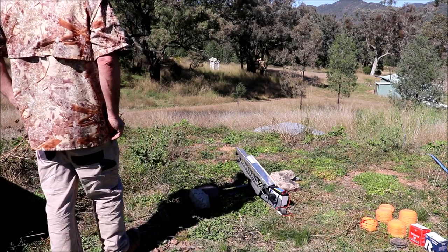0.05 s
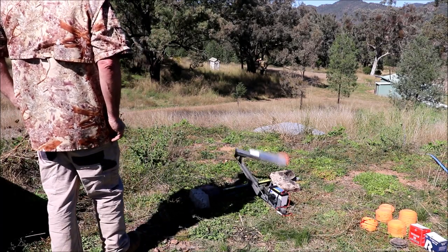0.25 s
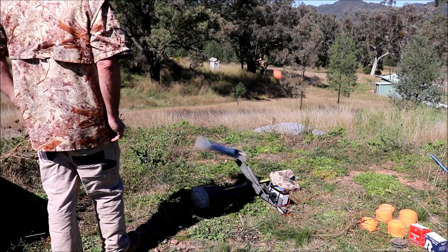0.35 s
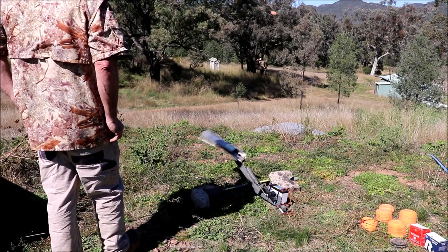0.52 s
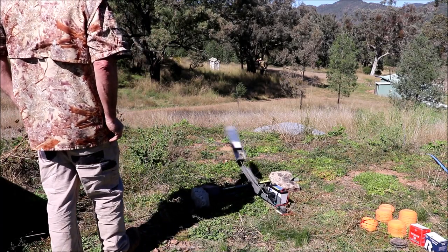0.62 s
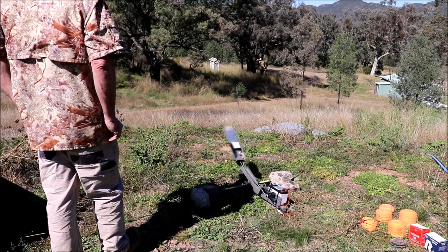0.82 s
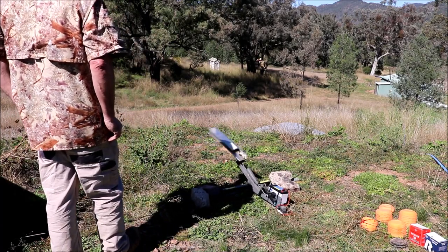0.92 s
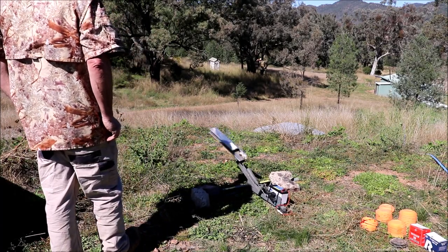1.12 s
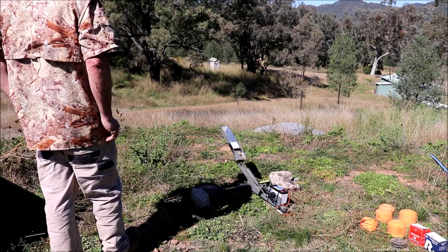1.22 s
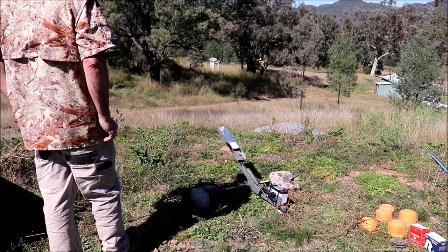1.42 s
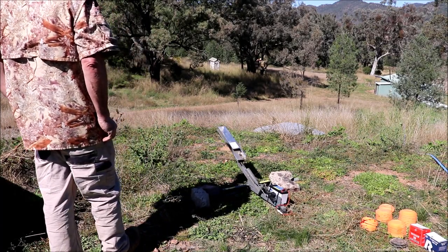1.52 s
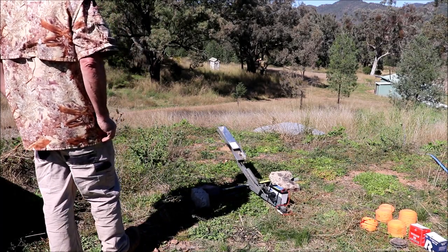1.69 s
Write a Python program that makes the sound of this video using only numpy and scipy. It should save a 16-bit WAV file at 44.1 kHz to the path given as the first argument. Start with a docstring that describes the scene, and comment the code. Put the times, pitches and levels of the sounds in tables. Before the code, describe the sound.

A clay target thrower lets go with a faint tick and hollow double knock, a brief swish and loud steel slam, then rattling knocks and spring ringing that thin out, heard fairly close in quiet open air.

```python
"""Over quiet open air comes a faint tick, then the hollow double knock of a clay target thrower's latch letting go.
The steel arm swishes round and slams past its stop, then swings to and fro, knocking and rattling.
Frame and spring ring on, a loose part clinks, the pivot groans, and a last soft knock brings the arm to rest.
Shaped noise makes the crashes, rattle, swish and air; decaying tones make the ringing metal;
an uneven, slipping tone makes the groan."""
import sys
import numpy as np
from scipy import signal
from scipy.io import wavfile
from scipy.ndimage import uniform_filter1d

SR = 44100
rng = np.random.default_rng(int(sys.argv[2]) if len(sys.argv) > 2 else 0)


def wrap_up_sound(samples):
    """Save the sound to the file named by the first command line argument, as 16-bit audio."""
    columns = np.atleast_2d(samples).T
    # keep every value between -1 and 1, then stretch to whole-number steps
    tamed = np.clip(columns, -1, 1)
    steps = np.round(tamed * 32767).astype(np.int16)
    wavfile.write(sys.argv[1], SR, steps)


N = 77175
T = np.arange(N) / SR  # time of every sample [s]
BAND_HZ = 25 * 2 ** (np.arange(29) / 3)  # centres of the third-octave bands
# In every table, t60 is the time a ring takes to fade by 60 dB.

# Steel hitting steel; bass and middle add to the contact colour: (time [s], contact length [s],
# bass [dB], middle [dB], treble slope [dB per octave, first octave], ring of the frame [dB])
KNOCKS = [(0.082, 0.0031, -37.5, -44, -1.5, -79), (0.2299, 0.0067, -29.5, -21.5, -8.5, -43),
          (0.2467, 0.0029, -22, -20.5, -1, -41), (0.3346, 0.0058, -59, -12.5, -4.5, -27.5),
          (0.347, 0.0054, -48, -8, -12, -68), (0.3499, 0.0085, -51, -24.5, 1.5, -38),
          (0.379, 0.012, -72, -22.5, -3.5, -39.5), (0.3981, 0.0032, -54, -27, -1, -31.5),
          (0.466, 0.004, -47, -22.5, 0, -31), (0.4813, 0.0059, -20, -9.5, -8, -67),
          (0.521, 0.02, -36, -41.5, 1.5, -42), (0.547, 0.011, -38, -36, 0.5, -32),
          (0.5542, 0.0043, -19, -22, 0, -33.5), (0.594, 0.042, -34, -19, -24, -34),
          (0.6346, 0.01, -48, -27, -4, -43), (0.6738, 0.008, -31, -15, -9, -44),
          (0.725, 0.0073, -69, -24.5, 0, -70), (0.7387, 0.0036, -30, -17, -0.25, -29),
          (0.845, 0.012, -45, -31.5, -8.5, -55), (0.9223, 0.012, -66, -31, -3, -50),
          (0.943, 0.004, -33.5, -14, -2.5, -32), (1.0684, 0.0081, -37.5, -39.5, 1, -52.5),
          (1.118, 0.084, -46, -38, -17, -55.5), (1.178, 0.014, -37.5, -38, -13.5, -52.5),
          (1.372, 0.032, -46, -38.5, -15.5, -47)]
BASS_HZ, MIDDLE_HZ, TREBLE_FROM_HZ = 372, 1140, 1087
TREBLE_CURVE = 1.51  # the slope grows ever steeper after the first octave
ATTACK_S, CONTACT_SHAPE = 0.00062, 0.95  # time constant of the rise; exponent of the fall
# Shared tone colour of the contacts: (frequency [Hz], relative level [dB per third octave])
CONTACT_COLOUR = [(110, -46), (310, -8.5), (600, -10.5), (900, -9.5), (3600, 1.5), (6300, -6), (8200, -4),
                  (10000, -14.5), (15000, -22.5)]
# Colour of the dense ring after a contact: (frequency [Hz], relative level [dB per third octave])
SHIMMER_COLOUR = [(60, -34), (550, -14), (1000, -4), (2400, -11), (3200, -6.5), (8000, -29), (13000, -36)]
# How long that ring lasts: (frequency [Hz], t60 [s])
SHIMMER_T60 = [(150, 0.35), (1000, 0.3), (12000, 0.19)]
WASH_DB, PARTIALS_DB = -4, -7  # shares of the shimmer made from noise and from single tones
PARTIAL_HZ = np.geomspace(750, 11000, 110)  # even spacing, before the random shifts

# Ringing tones of arm and frame: (frequency [Hz], relative level [dB], t60 [s])
FRAME_MODES = [(440.5, -8.5, 0.12), (698, -13.5, 0.88), (895, -2, 0.2), (1044, 0, 0.35), (1233, -1, 0.33),
               (1397, -7, 0.53), (1585, -16, 0.43)]
# The latch's hollow double knock: (time [s], level [dB])
LATCH_BLOWS = [(.2325, -27), (.248, -21.5)]
# Ringing tones of the latch: (frequency [Hz], relative level [dB])
LATCH_MODES = [(270, -8.5), (380, -2), (694, 2)]
# The main blow on the stop: (time [s], level [dB])
STOP_BLOWS = [(.35, -9.5)]
# Ringing tones of the stop: (frequency [Hz], relative level [dB])
STOP_MODES = [(885, -1), (965, -5), (1165, -5)]
# A bolted joint snaps across its play: (time [s], level [dB])
JOINT_BLOWS = [(.482, -28.5), (.556, -25.5), (.9265, -29)]
# Ringing tones of the joint: (frequency [Hz], relative level [dB])
JOINT_MODES = [(2950, -8), (3180, 0.5), (7009, -6.5)]
# Clinks of a loose part: (time [s], level [dB])
CLINKS = [(1.0705, -40)]
# Ringing tones of the loose part: (frequency [Hz], relative level [dB])
LOOSE_MODES = [(2433, -3), (2799, -1.5), (4479, 0), (6363, -10)]
# The arm settles on its rest: (time [s], level [dB])
REST_BLOWS = [(1.373, -44)]
# Ringing tones of the rest: (frequency [Hz], relative level [dB])
REST_MODES = [(1050, 6.5), (1997, 1.5), (3467, -4), (3693, -10)]
LATCH_T60_S, STOP_T60_S, JOINT_T60_S, LOOSE_T60_S, REST_T60_S = 0.014, 0.068, 0.083, 0.13, 0.13
BODY_T60_S, BODY_DB = 0.031, -4  # ring of the steel channel, against the direct sound
FRAME_EDGE_HZ, PARTS_EDGE_HZ = 200, 700  # little bass gets out below these

# The spring: (resting pitch [Hz], level from the jolt [dB],
# level against each knock's frame ring [dB], t60 after a knock [s])
SPRING_MODES = [(1763, -33, -14.5, 1.5), (2142, -25, -11.5, 0.7)]
JOLT_S, JOLT_T60_S, SPRING_FLUTTER_DB = 0.364, 0.43, 3
SPRING_SWAY, SWINGS_PER_S, SWAY_T60_S = 0.02, 5.3, 1.9  # sway as a share of the pitch

# The arm sweeping round: (frequency [Hz], level [dB per third octave])
SWISH_COLOUR = [(200, -64.5), (950, -44.5), (4800, -45), (8000, -56.5)]
SWISH_S, SWISH_WIDTH_S = 0.2975, 0.022
# Loose joints chattering: (frequency [Hz], level [dB per third octave])
RATTLE_COLOUR = [(50, -81.5), (380, -45), (3200, -54.5), (11000, -65)]
RATTLE_S, RATTLE_WIDTH_S, RATTLE_T60_S = 0.62, 0.19, 0.03
RATTLE_PER_S, RATTLE_SPREAD_DB = 160, 4  # average touches per second; how their strength varies
GRIT_DB, GRIT_FROM_HZ = 4, 2200

# Quick slips of the pivot, before jitter: (time [s], rate [slips per s])
GROAN_RATE = [(1.245, 402), (1.28, 445), (1.32, 415)]
# Tones at 1, 2, 3... times the slip rate: (level [dB])
GROAN_OVERTONES_DB = [-45.5, -44.5, -47.5, -57]
GROAN_S, GROAN_WIDTH_S, GROAN_JITTER = 1.2785, 0.033, 0.0177  # jitter as a share of the rate
GROAN_RASP_DB = -21  # against the sweep of the arm
# Single tones as the frame rocks and settles: (time [s], width [s], frequency [Hz], level [dB])
SINGING = [(.595, 0.024, 152.1, -43.5), (0.683, .017, 707, -29.5), (0.878, 0.026, 688, -43),
           (0.986, 0.031, 144.2, -48.5), (1.6, 0.24, 353.7, -63.5)]

# Outdoor background: (frequency [Hz], level [dB per third octave])
AIR_COLOUR = [(25, -83), (400, -73.5), (5000, -71), (10000, -76.5)]
# Stereo width of all noise: (frequency [Hz], side against mid level [dB])
STEREO_WIDTH = [(30, -8.5), (2000, -102), (13000, -2.5)]
CUTOFF_HZ = 16000


def from_db(db):
    """Turn decibels into gain."""
    return 10 ** (np.asarray(db) / 20)


def fade(age, t60):
    """Gain of a ring after some time."""
    return from_db(-60 * age / t60)


def onset(age):
    """The quick rise of a contact."""
    return 1 - np.exp(-age / ATTACK_S)


def swell(s, width):
    """A smooth rise and fall around one moment."""
    return np.exp(-((T - s) / width) ** 2 / 2)


def wander(size):
    """Smooth random drift of spread 1, averaged over that many samples."""
    drift = uniform_filter1d(rng.standard_normal(N), size=size)
    return drift / drift.std()


def at_bands(points):
    """Read a table of (frequency, value) at every band centre, as a column."""
    hz, value = np.transpose(points)
    return np.interp(np.log(BAND_HZ), np.log(hz), value)[:, None]


def noise_bands():
    """Third-octave noise in stereo: channels x bands x samples, each mid band at rms 1."""
    # the extra tenth of a second lets the filters settle
    white = rng.standard_normal((2, 2, N + SR // 10))
    edge = 2 ** (1 / 6)
    bands = []
    for k, hz in enumerate(BAND_HZ):
        sos = signal.butter(2, [hz / edge, hz * edge], "band", fs=SR, output="sos")
        band = signal.sosfilt(sos, white[k % 2])[:, -N:]
        bands.append(band / band.std(axis=1, keepdims=True))
    mid, side = np.swapaxes(bands, 0, 1)
    side = side * from_db(at_bands(STEREO_WIDTH))
    return np.array([mid + side, mid - side])


def ring_power(kicks, t60):
    """Let the power of each kick die away."""
    return signal.lfilter([1], [1, -fade(1 / SR, t60) ** 2], kicks)


def knocks():
    """Power per band of the knocks: a short crash of contact, then the steel's dense ring dying away."""
    power, kicks = np.zeros((len(BAND_HZ), N)), np.zeros(N)
    octaves_up = np.maximum(np.log2(BAND_HZ / TREBLE_FROM_HZ), 0)[:, None]
    age = T[:SR // 10]
    for s, length, bass_db, middle_db, slope, ring_db in KNOCKS:
        start = int(s * SR)
        shape = onset(age) * np.exp(-(age / length) ** CONTACT_SHAPE)
        balance = at_bands([(BASS_HZ, bass_db), (MIDDLE_HZ, middle_db)])
        treble = slope * octaves_up ** TREBLE_CURVE
        colour = at_bands(CONTACT_COLOUR) + balance + treble
        power[:, start:start + len(age)] += (from_db(colour) * shape) ** 2
        kicks[start] += from_db(ring_db) ** 2
    tails = np.array([ring_power(kicks, t60) for t60 in at_bands(SHIMMER_T60).ravel()])
    return power + from_db(at_bands(SHIMMER_COLOUR) + WASH_DB) ** 2 * tails


def strike(blows, modes):
    """Each blow sets every tone ringing from zero, pushed in a random direction, and it dies away."""
    s, db = np.transpose(blows)
    out = np.zeros(N)
    signs = rng.choice([-1, 1], (len(s), len(modes)))
    for (hz, mode_db, t60), sign in zip(modes, signs.T):
        kicks = np.full(N, 1e-18, complex)  # not quite zero, to keep the filter fast
        kicks[(s * SR).astype(int)] = from_db(db + mode_db) * sign
        # a spinning complex number that shrinks: its imaginary part is a fading sine
        turn = fade(1 / SR, t60) * np.exp(2j * np.pi * hz / SR)
        out += signal.lfilter([1], [1, -turn], kicks).imag
    return out


def partials():
    """The steel's many weak overtones, unevenly spaced: (frequency [Hz], relative level [dB], t60 [s])."""
    hz = PARTIAL_HZ + np.gradient(PARTIAL_HZ) * (rng.random(len(PARTIAL_HZ)) - .5)
    db = np.interp(hz, BAND_HZ, at_bands(SHIMMER_COLOUR).ravel())
    t60 = np.interp(hz, BAND_HZ, at_bands(SHIMMER_T60).ravel())
    return list(zip(hz, db + PARTIALS_DB, t60))


def frame():
    """Every knock sets the tones and overtones of arm and frame ringing."""
    blows = [(row[0], row[-1]) for row in KNOCKS]
    return strike(blows, FRAME_MODES + partials())


def part(blows, modes, t60):
    """A small part whose tones all die away alike."""
    return strike(blows, [(hz, db, t60) for hz, db in modes])


def latch():
    """The latch lets go: low, very short tones give a hollow double knock."""
    return part(LATCH_BLOWS, LATCH_MODES, LATCH_T60_S)


def small_parts():
    """Stop, bolted joint, loose part and rest each ring at their own tones when hit."""
    stop = part(STOP_BLOWS, STOP_MODES, STOP_T60_S)
    joint = part(JOINT_BLOWS, JOINT_MODES, JOINT_T60_S)
    loose = part(CLINKS, LOOSE_MODES, LOOSE_T60_S)
    rest = part(REST_BLOWS, REST_MODES, REST_T60_S)
    return stop + joint + loose + rest


def through_body(x):
    """Contacts reach the air partly through the steel channel's short, uneven ring; power is kept."""
    age = T[:SR // 20]
    ring = rng.standard_normal(len(age)) * fade(age, BODY_T60_S)
    response = from_db(BODY_DB) * ring / np.linalg.norm(ring)
    response[0] += 1  # the direct sound
    response = response / np.linalg.norm(response)
    return signal.fftconvolve(x, response[None], axes=1)[:, :N]


def radiate(x, edge_hz):
    """Narrow steel parts radiate almost no bass."""
    return signal.sosfilt(signal.butter(3, edge_hz, "high", fs=SR, output="sos"), x)


def spring():
    """Jolted once and topped up by knocks; its pitch sways as the swinging arm stretches it."""
    age = np.maximum(T - JOLT_S, 0)
    swing = np.cos(2 * np.pi * SWINGS_PER_S * age) * fade(age, SWAY_T60_S)
    stretch = 1 + SPRING_SWAY * swing
    turns = 2 * np.pi * np.cumsum(stretch) / SR
    out = 0
    for hz, jolt_db, knock_db, t60 in SPRING_MODES:
        energy = 0
        for s, *_, ring_db in KNOCKS:
            ring = from_db(ring_db + knock_db) * fade(np.abs(T - s), t60)
            energy = energy + (T > s) * ring ** 2
        level = from_db(jolt_db) * fade(age, JOLT_T60_S) + np.sqrt(energy)
        flutter = from_db(SPRING_FLUTTER_DB * np.clip(wander(size=900), -2, 2))
        out = out + level * flutter * np.sin(hz * turns)
    return onset(age) * out  # silent until the jolt


def rattle():
    """Power per band of many small random contacts in the joints, once the arm has hit the stop."""
    strength = from_db(RATTLE_SPREAD_DB * np.clip(rng.standard_normal(N), -2, 2))
    touches = (rng.random(N) < RATTLE_PER_S / SR) * strength ** 2
    power = ring_power(touches, RATTLE_T60_S)
    moving = swell(RATTLE_S, RATTLE_WIDTH_S) * (T > STOP_BLOWS[0][0])
    return (from_db(at_bands(RATTLE_COLOUR)) * moving) ** 2 * power / power.mean()


def friction():
    """Power per band of steel rubbing on steel: the sweeping arm, and faintly the groaning pivot."""
    sweep = swell(SWISH_S, SWISH_WIDTH_S)
    rasp = from_db(GROAN_RASP_DB) * swell(GROAN_S, GROAN_WIDTH_S)
    return (from_db(at_bands(SWISH_COLOUR)) * (sweep + rasp)) ** 2


def grit():
    """Rough steel touches in tiny uneven catches: a treble gain that keeps the mean power."""
    gain = from_db(GRIT_DB * np.clip(wander(size=30), -2, 2))
    return np.where(BAND_HZ[:, None] > GRIT_FROM_HZ, gain / np.sqrt(np.mean(gain ** 2)), 1)


def clatter():
    """Knocks, rattle and friction add their power and shape one noise, made gritty in the treble."""
    power = knocks() + rattle() + friction()
    return (noise_bands() * np.sqrt(power) * grit()).sum(axis=1)


def groan():
    """The pivot sticks and slips unevenly, at a rate that rises and sags as the arm slows."""
    rate = np.interp(T, *np.transpose(GROAN_RATE)) * (1 + GROAN_JITTER * wander(size=200))
    phase = 2 * np.pi * np.cumsum(rate) / SR
    voice = 0
    for number, db in enumerate(GROAN_OVERTONES_DB, start=1):
        unevenness = 1 + .5 * wander(size=100)
        voice = voice + from_db(db) * unevenness * np.sin(number * phase)
    return swell(GROAN_S, GROAN_WIDTH_S) * voice


def singing():
    """Single resonances of the steel that swell and fade as the frame rocks and settles."""
    return sum(from_db(db) * swell(s, width) * np.sin(2 * np.pi * hz * T) for s, width, hz, db in SINGING)


def open_air():
    """A quiet, steady outdoor background of shaped noise."""
    return (noise_bands() * from_db(at_bands(AIR_COLOUR))).sum(axis=1)


def scene():
    """The thrower straight ahead, over quiet open air."""
    ringing = radiate(frame() + latch(), FRAME_EDGE_HZ) + radiate(small_parts(), PARTS_EDGE_HZ)
    steel = through_body(clatter()) + ringing
    return steel + spring() + groan() + singing() + open_air()


def record(dry):
    """Cut the very top of the sound steeply."""
    return signal.sosfilt(signal.ellip(10, .1, 80, CUTOFF_HZ, fs=SR, output="sos"), dry)


dry = scene()
out = record(dry)
wrap_up_sound(out)
```